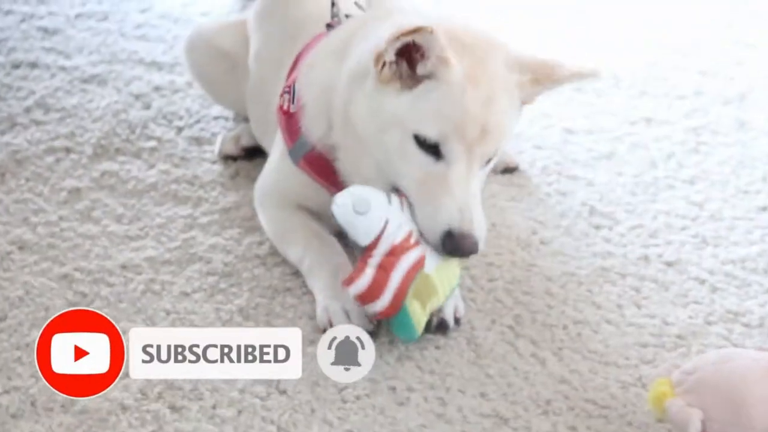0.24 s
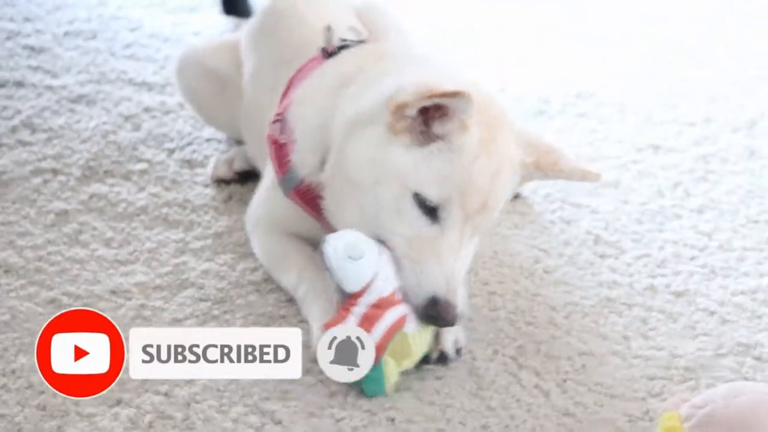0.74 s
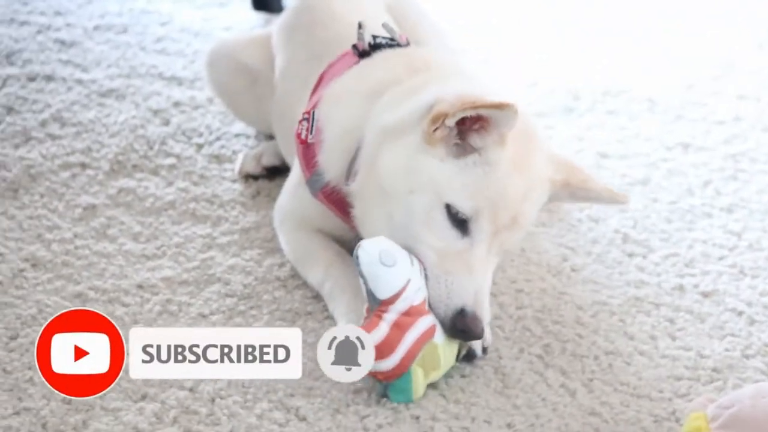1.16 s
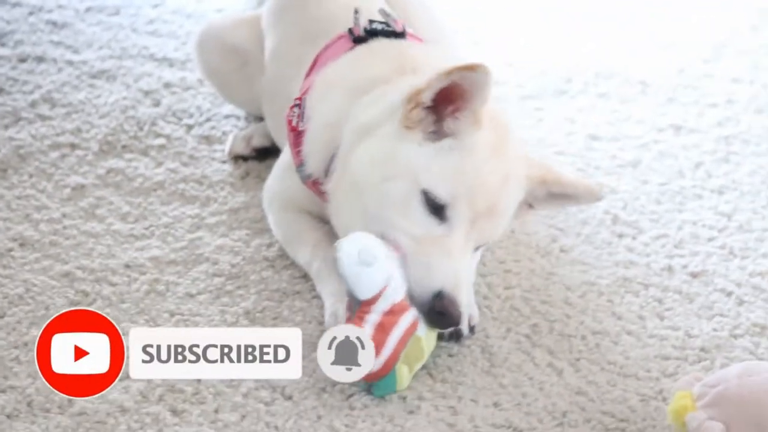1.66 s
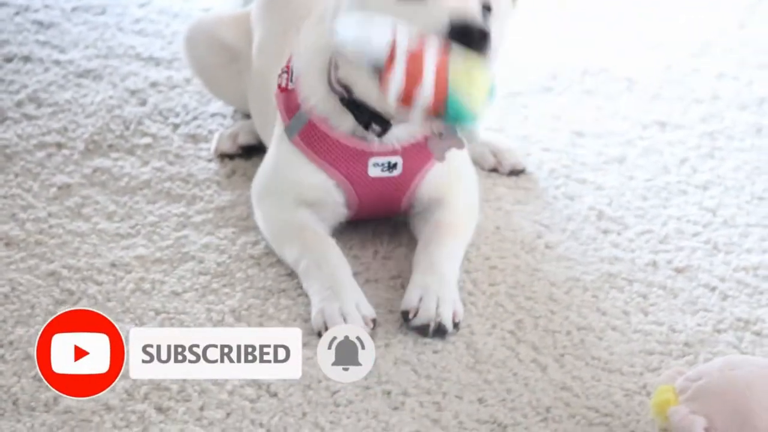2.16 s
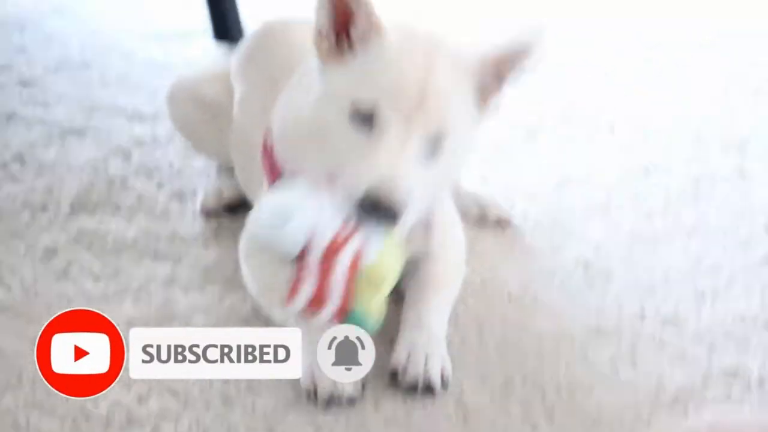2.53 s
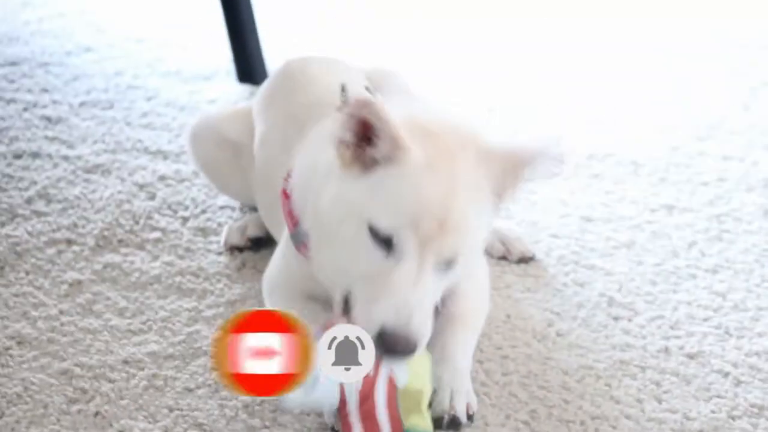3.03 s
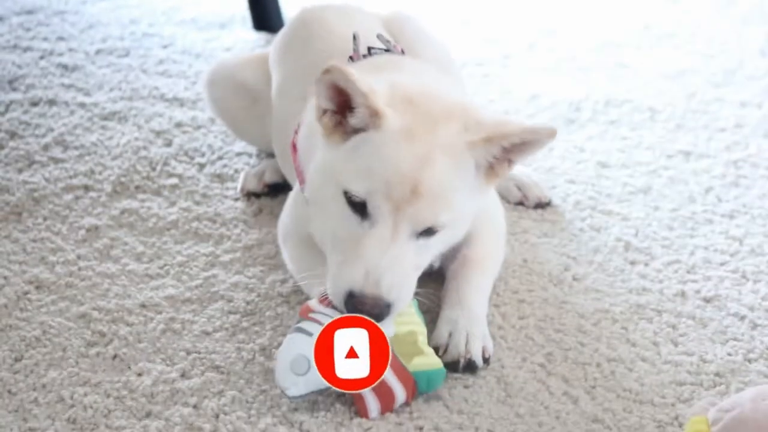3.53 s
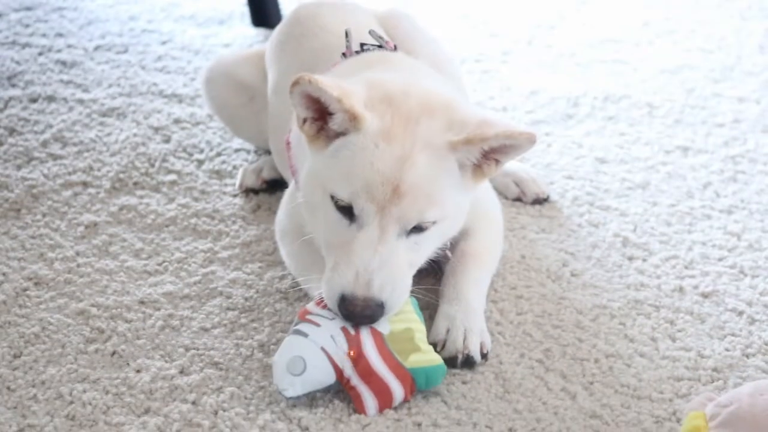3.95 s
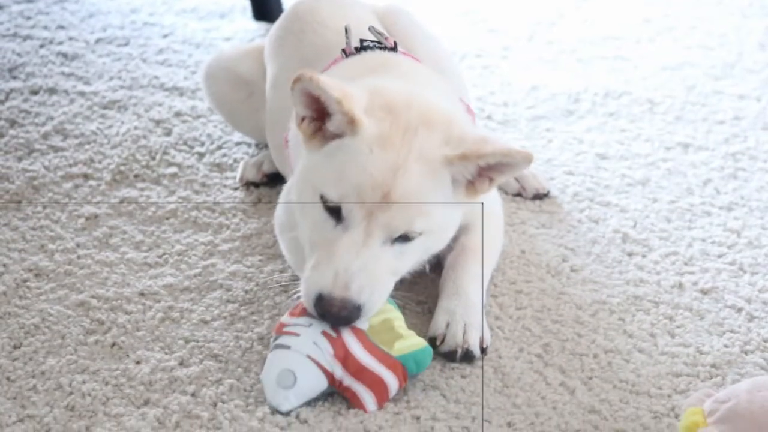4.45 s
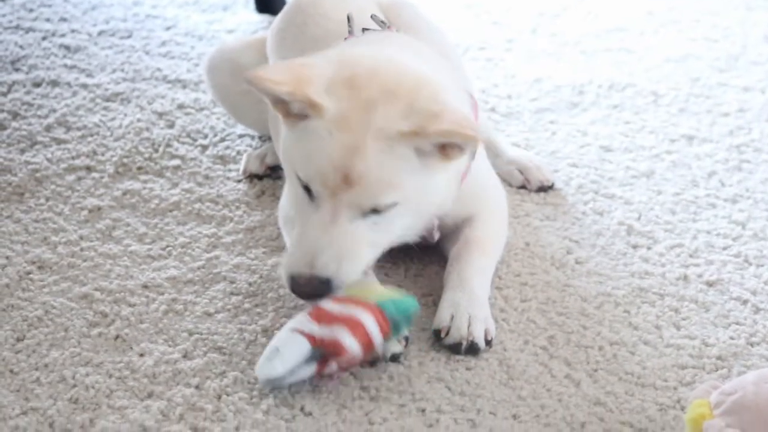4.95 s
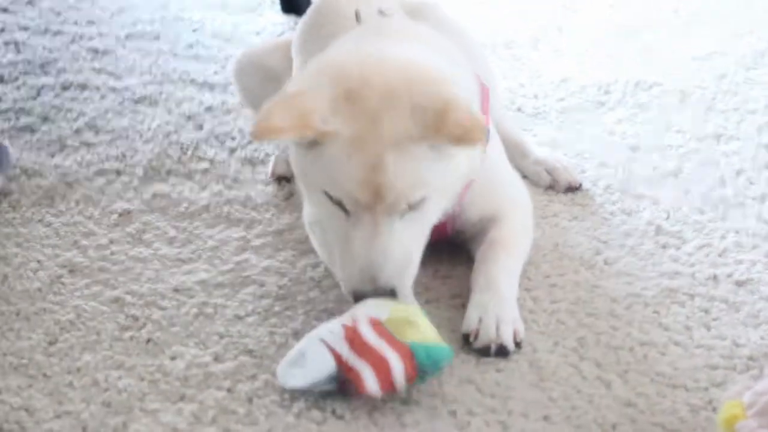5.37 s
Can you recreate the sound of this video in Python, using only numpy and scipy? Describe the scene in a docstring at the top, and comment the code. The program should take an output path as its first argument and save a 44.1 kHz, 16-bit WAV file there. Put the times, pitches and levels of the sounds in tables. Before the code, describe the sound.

A small reed squeaker inside a soft toy chirps unevenly under a puppy's bites, bright on free presses and duller when jaws cover it. Plastic pops kick the pitch upward, and light tooth or claw touches tick between. Short echoes and a modest room tail follow each squeak. A near microphone also catches faint hiss and low hum, with a lone paw thump on carpet near the end.

```python
"""A puppy chews a plush toy on a carpet, close to a camera in a quiet living room with a low hum.
From the start, each bite drives air through the squeaker's reed: a clean buzz that follows pressure.
Soon the plastic bulb starts to pop as its wall snaps, and a paw thumps softly on the carpet.
Teeth, claws and the toy touching down tick in between, as noise bursts; echoes and room ring on.
After the last squeak, only a thump and a few ticks break the hum."""
import sys
import numpy as np
from scipy import signal
from scipy.fft import rfft, irfft, next_fast_len
from scipy.io import wavfile
from scipy.ndimage import uniform_filter1d

SR = 44100
rng = np.random.default_rng(int(sys.argv[2]) if len(sys.argv) > 2 else 0)


def unload_audio(sound):
    """Save the sound as a 16-bit wav file, at the path given as the first command line argument."""
    columns = np.transpose(np.atleast_2d(sound))
    # keep every value between -1 and 1, then stretch to whole-number steps
    steps = np.round(np.clip(columns, -1, 1) * 32767)
    wavfile.write(sys.argv[1], SR, steps.astype(np.int16))


N = 246777  # length in samples
LEAD_S = .06  # the mix starts this early, for sounds already under way


def gain_of(db):
    """Turns decibels into a gain: 20 dB is ten times the swing."""
    return 10 ** (np.asarray(db) / 20)


def evened(x):
    """Scales a signal to an average strength (rms) of 1."""
    return x / np.sqrt(np.mean(x ** 2) + 1e-20)


def read(points, hz):
    """Reads a curve between its points, with pitch spaced by ratio as we hear it."""
    point_hz, value = np.transpose(points)
    return np.interp(np.log(hz + 1), np.log(point_hz + 1), value)


def add(mix, s, sound):
    """Adds a sound to the mix at time s, cutting off what runs past the end."""
    part = mix[..., round((s + LEAD_S) * SR):][..., :sound.shape[-1]]
    part += sound[..., :part.shape[-1]]


# how alike left and right are: (f/Hz, likeness 0-1)
LIKENESS = [(60, 0.98), (130, 0.93), (290, 0.83), (640, 0.64), (1410, 0.21), (3100, 0.022), (6820, 0.029),
            (15000, 0.049)]


def left_and_right(left, other, hz):
    """Mixes some left noise into the right, so the two sides are alike mostly in the bass."""
    same = np.clip(read(LIKENESS, hz), -1, 1)[:, None]
    right = same * left + np.sqrt(1 - same ** 2) * other
    return np.array([left, right])


# colour of house hum and microphone hiss, before its overall level is set: (f/Hz, relative level/dB)
HUM_COLOUR = [(12, -73), (20, -36), (43, -21.5), (81, 0), (129, -7.5), (151, -12), (183, -12.5),
              (410, -12.5), (582, -22), (1080, -24.5), (2860, -31.5), (3270, -30), (3550, -30.5),
              (12600, -39.5)]
# added to that colour, so the hiss thins out at the top: (f/Hz, level change/dB)
HISS_TOP_FALL = [(12400, -8), (12900, -14), (16000, -20)]
HUM_DB, HUM_PATCHY_DB = -66.5, 1.0


def hum():
    """House hum and hiss: random short-time spectra whose strength drifts in patches."""
    frames, hz = N // 512 + 5, np.fft.rfftfreq(2048, 1 / SR)
    a, b, c, d, patches = rng.standard_normal((frames, 1025, 5)).T
    patches = uniform_filter1d(patches, 12, 0)  # smooth over pitch
    patches = evened(uniform_filter1d(patches, 8, 1))  # and over time
    spectra = left_and_right(a + 1j * b, c + 1j * d, hz)
    colour_db = read(HUM_COLOUR, np.minimum(hz, 12400)) + read(HISS_TOP_FALL, hz)
    spectra *= gain_of(colour_db[:, None] + HUM_PATCHY_DB * patches)
    noise = signal.istft(spectra, nperseg=2048, noverlap=1536)[1][:, :N]
    return gain_of(HUM_DB) * evened(noise)


JOLT_RISE_S, JOLT_PITCH_S, JOLT_LEVEL_S = 0.0034, 0.0062, 0.028
JOLT_DB_PER_HZ = 0.0823  # level change for each Hz of jolt


def jolt(t, fall_s):
    """A snapping bulb wall jolts the pressure: a quick swell, then a decay, in Hz of pitch."""
    s, size_hz = np.array(BULB_POPS)[:, [0, 3]].T
    late = t[:, None] - s - JOLT_RISE_S / 2
    rise = np.minimum(late, 0) / JOLT_RISE_S
    fall = np.maximum(late, 0) / fall_s
    return (size_hz * np.exp(rise - fall)).sum(1)


# bulb colour, free: (f/Hz, level against the fundamental/dB)
FREE_BULB = [(800, 1), (1650, 6.5), (2500, 6.5), (3300, 5), (4200, 2.5), (5000, 1.5)]
# bulb colour, covered by jaws and plush: (f/Hz, level against the fundamental/dB)
COVERED_BULB = [(800, 1.5), (1650, -7.5), (2500, -13.5), (3300, -14), (4200, -15.5), (5000, -19.5)]
# neck colour with air driven out: (f/Hz, level against the neck resonance/dB)
NECK_BLOWN = [(6000, 0), (7500, 1.5), (9000, -14.5), (11000, -6.5), (13000, -14)]
# neck colour with air drawn in: (f/Hz, level against the neck resonance/dB)
NECK_SUCKED = [(6000, -19), (7500, -1), (9000, -2.5), (11000, -7), (13000, -2)]
# added above the neck resonance, mostly a fall: (f/Hz, level change/dB)
NECK_TOP = [(8900, 6.5), (9700, -1), (11000, -3), (13000, -16.5), (15000, -24)]
DIP_OCTAVES = 0.23
FLUTTER_DB, FLUTTER_S = 2.5, .015  # each harmonic's level wavers slowly at random


def colour(order, partial_hz, treble_db, covered, inward, dip_hz, dip_db):
    """The bulb colours the lowest six harmonics, the neck the rest; a dip or bump reshapes both."""
    body_db = (1 - covered) * read(FREE_BULB, partial_hz) + covered * read(COVERED_BULB, partial_hz)
    body = gain_of(body_db) * (order <= 6)
    neck_db = (1 - inward) * read(NECK_BLOWN, partial_hz) + inward * read(NECK_SUCKED, partial_hz)
    neck = gain_of(neck_db + read(NECK_TOP, partial_hz)) * (order > 6)
    body_share = body / np.linalg.norm(body, axis=0)
    neck_share = gain_of(treble_db) * neck / np.linalg.norm(neck, axis=0)
    noise = rng.standard_normal(partial_hz.shape)
    flutter = evened(uniform_filter1d(noise, round(FLUTTER_S * SR), axis=1))
    dip = np.exp(-(np.log2(partial_hz / dip_hz) / DIP_OCTAVES) ** 2)
    return (body_share + neck_share) * gain_of(dip_db * dip + FLUTTER_DB * flutter)


# one row a squeak; pitch and level are before jolts, level also before left-right balance:
# (start t/s, hold t/s, release t/s, start f/Hz, end of hold f/Hz, arch of pitch f/Hz, top of arch 0-1,
#  start level/dB, end of hold level/dB, start treble against level/dB, end treble against level/dB,
#  bulb free to covered 0-1, air out to drawn inward 0-1, dip or bump f/Hz, its level change/dB)
BITES = [ (-.045, 0.011, 0.039, 812, 790, 1, .4, -39, -43.5, 6.5, 5, 0.36, 0.06, 1610, -6),
         (0.039, 0.0011, 0.0091, 775, 767, 0, .4, -38, -45.5, 1, 1, 0.05, 0.2, 2360, -11),
         (0.123, .086, 0.022, 760.4, 751.6, 35, 0.28, -49, -50.5, -7.5, -7, 0.69, 0.66, 4200, -7.5),
         (.238, .023, 0.0053, 690.3, 755, 1, 0.3, -59.5, -49.5, -8, -5.5, 0.63, 0.86, 4170, -6),
         (0.347, 0.021, 0.028, 814.7, 837.6, -4.5, 0.55, -42.5, -43.5, 3.5, 2.5, 0.26, 0.47, 4040, -3.5),
         (.395, .035, 0.012, 720, 751.7, 15, 0.49, -52.5, -49.5, -1, 4, 0.34, 0, 4230, 0),
         (.598, 0.18, .018, 846, 722, -45.5, 0.31, -42, -55.5, -9, -10.5, 0.52, 0.69, 4630, -8.5),
         (1.066, .015, 0.028, 805, 840, -4.5, 0.3, -40, -42, -5.5, -0.5, 0.19, 0.05, 4460, -1),
         (1.152, 0.0025, 0.014, 789, 782, 4, .4, -43, -44, -4, -4, .3, 0, 4800, -4.5),
         (1.442, 0.0038, 0.0057, 836, 783, 11, .4, -66, -59, -14, -14, 1, 0.2, 4760, 3),
         (1.695, 0.0022, 0.026, 820, 804, 6, 0.3, -39.5, -42, -4.5, 1, 0.33, 0.35, 5000, -6.5),
         (2.228, .027, 0.0021, 804, 698, -3, 0.2, -38, -54.5, 4, -6.5, -.2, 0.16, 830, 0.5),
         (2.856, 0.055, 0.01, 825, 788, 30, 0.41, -47, -48.5, -3.5, -4, 0.6, 1, 2340, -6.5),
         (3.181, 0.019, .003, 811.4, 709, 3.5, 0.5, -42, -53.5, 1.5, 0.5, .7, 0.14, 4170, 1),
         (3.252, 0.033, 0.0098, 796, 820, -3, 0.1, -48.5, -48.5, -8, -3.5, 0.59, .9, 3640, -4.5),
         (3.466, 0.02, 0.018, 788, 774.6, -0.5, 0.3, -44.5, -49.5, 0.5, 3, 0.55, 0.11, 4160, -0.5),
         (3.625, 0.0019, 0.037, 844, 802, 2, .4, -44, -46.5, -9.5, -3, 0.88, 0.6, 3380, -2),
         (3.707, 0.012, 0.033, 781.6, 782.5, -6, .4, -48, -47.5, 1.5, 8, 0.49, 0.06, 2200, -4.5),
         (3.953, 0.067, 0.0033, 790, 798.2, 27.5, 0.46, -48, -47.5, -7, -5.5, 0.82, 0.72, 3350, -3),
         (4.221, 0.018, 0.023, 784, 783, -1.5, 0.5, -46, -46.5, -2.5, 5, 0.58, .05, 2380, -6),
         (4.431, 0.075, 0.013, 835, 809.6, 104.5, 0.43, -46, -45.5, -6.5, -5, 0.76, 0.55, 6300, -4), ]
SAG_HZ_PER_S, FADE_DB_PER_S = 4600, 590  # during the release
LEAK_SAG_PER_S = 10  # share of the pitch lost a second, after the release
DB_PER_HZ = 0.0361  # more pressure lifts pitch and level together
SWING_IN_S, RING_DOWN_S = 0.00083, .004
SCATTER_RAD = 0.52  # a random phase offset for each harmonic, so their peaks do not all line up
AIR_DB = -18  # air hiss against level, before treble is added


def squeak(start, hold, release, hz0, hz1, arch_hz, top, db0, db1, treble0_db, treble1_db,
           covered, inward, dip_hz, dip_db):
    """The reed chops the air once a cycle; bulb and neck colour the harmonics."""
    t = np.arange(start - .008, start + hold + release + .025, 1 / SR)
    held = np.clip((t - start) / hold, 0, 1)
    let_go = np.clip(t - start - hold, 0, release)
    after = np.maximum(t - start - hold - release, 0)
    # bending time puts the top of the arch where the row says
    bend = np.log(.5) / np.log(np.clip(top, .1, .9))
    arch = arch_hz * np.sin(np.pi * held ** bend)
    progress = np.clip((t - start) / (hold + release), 0, 1)
    treble_db = treble0_db + (treble1_db - treble0_db) * progress

    hz = hz0 + (hz1 - hz0) * held + arch - SAG_HZ_PER_S * let_go + jolt(t, JOLT_PITCH_S)
    hz = hz * (1 - LEAK_SAG_PER_S * after)  # the pitch sags as the last pressure leaks away
    level_db = db0 + (db1 - db0) * held + DB_PER_HZ * arch - FADE_DB_PER_S * let_go
    level_db = level_db + JOLT_DB_PER_HZ * jolt(t, JOLT_LEVEL_S)
    wobble = evened(uniform_filter1d(rng.standard_normal(len(t)), 60))
    turns = np.cumsum(hz * (1 + .003 * wobble)) / SR  # reed cycles so far

    order = np.arange(1, 19)[:, None]
    partial_hz = order * hz
    share = colour(order, partial_hz, treble_db, covered, inward, dip_hz, dip_db)
    # each puff radiates a push and a pull, and the neck rings on after it
    phase = .9 - 2.5 * np.arctan((partial_hz - 7300) / 1500)
    phase = phase + SCATTER_RAD * rng.standard_normal(order.shape)
    buzz = np.sqrt(2) * (share * np.cos(2 * np.pi * order * turns + phase)).sum(0)
    # air hisses through the slot while the reed is open
    slot = signal.butter(2, [4000, 9300], "bandpass", fs=SR, output="sos")
    reed_open = 1 + np.cos(2 * np.pi * turns)
    air = evened(signal.sosfilt(slot, rng.standard_normal(len(t)) * reed_open))
    # the swing grows before the start and dies after the release
    swing = np.exp(np.minimum(t - start, 0) / SWING_IN_S) * np.exp(-after / RING_DOWN_S)
    return t[0], gain_of(level_db) * swing * (buzz + gain_of(AIR_DB + treble_db) * air)


# how the two microphone ports differ in strength: (f/Hz, left over right level/dB)
LEFT_OVER_RIGHT = [(800, 3.5), (1600, 0.5), (2500, -1.5), (3800, 3), (5500, 2.5), (7500, 1.5), (9000, 0.5)]
# how the two ports differ in timing: (f/Hz, left lag/rad)
LEFT_LAG = [(300, 0.058), (800, 0.41), (2500, 0.99), (3800, 0.11), (5500, 1.3), (7800, 1.22), (11000, 1.36)]


def ports(x):
    """The direct sound reaches the two microphone ports with its own balance and lag."""
    hz = np.fft.rfftfreq(x.shape[1], 1 / SR)
    half = gain_of(read(LEFT_OVER_RIGHT, hz) / 2) * np.exp(-.5j * read(LEFT_LAG, hz))
    return irfft(rfft(x) * np.array([half, 1 / half]), x.shape[1])


# bounces off the floor and near furniture: (delay t/s, level against the direct sound/dB)
NEAR_BOUNCES = [(.0021, -16), (.0047, -17), (.009, -14.5), (.014, -10.5)]


def add_echoes(mix, mono):
    """Near surfaces return single delayed copies, by turns on the left and right."""
    for k, (delay_s, db) in enumerate(NEAR_BOUNCES):
        add(mix[k % 2], delay_s - LEAD_S, gain_of(db) * mono)  # undo the lead: mono already has it


# how long the room rings: (f/Hz, time to fall by 60 dB t/s)
RING_TIMES = [(250, 0.36), (800, 0.43), (1740, 0.41), (4590, 0.43), (8000, 0.43), (13000, 0.23)]
# colour of the ringing, before its overall level is set: (f/Hz, relative level/dB)
RING_COLOUR = [(200, -6.5), (450, -1.5), (800, -0.5), (2000, -6), (5000, -1.5), (7000, -8.5), (8800, 0.5),
               (10000, 0), (13000, 6)]
ROOM_DB, ROOM_START_S, ROOM_BUILD_S = -2.0, 0.001, 0.011


def room(x):
    """A dense noise tail stands for the reflections, each band dying at its own speed."""
    noise = rng.standard_normal((2, SR))
    hz, t, (left, other) = signal.stft(noise, SR, nperseg=256)
    spectra = left_and_right(left, other, hz)
    spectra *= gain_of(-60 * t / read(RING_TIMES, hz)[:, None] + read(RING_COLOUR, hz)[:, None])
    tail = signal.istft(spectra, SR, nperseg=256)[1]
    tail *= np.clip((np.arange(tail.shape[1]) / SR - ROOM_START_S) / ROOM_BUILD_S, 0, 1)
    tail /= np.linalg.norm(tail[0])
    return gain_of(ROOM_DB) * signal.fftconvolve(x[None], tail, axes=1)[:, :len(x)]


SNAP_EARLY = 128  # samples of room before a burst, for the smear of its filter


def snap(s, db, centre_hz, octaves, length):
    """A short burst of noise with a quick rise, in a broad band."""
    t = np.arange(1024) / SR
    burst = rng.standard_normal(len(t)) * (1 - np.exp(-t / 0.00013)) * np.exp(-3 * t / length)
    hz = np.fft.rfftfreq(len(t), 1 / SR) + 1
    band = np.exp(-(np.log2(hz / centre_hz) / octaves) ** 2 / 2)
    burst = irfft(rfft(np.roll(burst, SNAP_EARLY)) * band)
    strength = np.sqrt((burst ** 2).sum() / (length * SR / 4))
    return s - SNAP_EARLY / SR, gain_of(db) * burst / strength


# the bulb's wall snaps in or out; level is before the ports:
# (t/s, level/dB, centre f/Hz, jolt of the reed's pitch f/Hz)
BULB_POPS = [(0.032, -45, 2480, -6), (0.202, -54, 900, 48.5), (.259, -50, 880, 47),
             (.363, -39.5, 720, 60.5), (.428, -47, 870, 11.5), (.766, -73, 900, 64.5),
             (1.079, -38, 716, 100.5), (2.914, -62, 900, 27), (3.282, -59, 905, 34),
             (3.483, -39.5, 785, 111.5), (3.718, -42, 800, 102.5), (4.005, -72, 890, 54),
             (4.239, -36.5, 700, 100.5), (4.509, -52.5, 626, 110)]


def pop(s, db, centre_hz, _jolt_hz):
    """The bulb's wall snaps: a brief noise burst around one pitch."""
    return snap(s, db, centre_hz, octaves=1.0, length=0.0095)


# a paw on the carpet; level is the peak setting before the ports: (t/s, level/dB, f/Hz, length t/s)
PAW_THUMPS = [(0.206, -48.5, 183.4, 0.025), (5.275, -47.5, 238, 0.0083)]


def thump(s, db, hz, length):
    """A paw on carpet: a few soft low cycles that swell and fade."""
    t = np.arange(0, length, 1 / SR)
    return s, gain_of(db) * np.sin(2 * np.pi * hz * t) * np.sin(np.pi * t / length)


# teeth, claws and the toy touching down; level is before the ports:
# (t/s, level/dB, centre f/Hz, spread/octaves, length t/s)
TOUCHES = [(0.818, -51.5, 443, 0.59, 0.0076), (1.441, -50.5, 580, 1, 0.0088),
           (2.178, -50.5, 1320, 0.94, 0.019), (2.193, -45, 2450, 0.74, 0.0039),
           (5.273, -58, 1800, 1.04, 0.0052), (5.277, -54, 1000, 1.1, 0.0071),
           (5.281, -55, 450, 0.25, 0.0084), (5.324, -66.5, 2350, 0.6, 0.012)]


def tick(s, db, centre_hz, octaves, length):
    """A small hard touch: a noise burst with its own pitch, spread and length."""
    return snap(s, db, centre_hz, octaves, length)


PAN_DB = -2.5  # squeaks, left over right


def scene():
    """Toy and puppy, their near echoes and the room, over the hum."""
    lead = round(LEAD_S * SR)
    near = np.zeros((2, next_fast_len(N + lead)))
    pan = gain_of([[PAN_DB / 2], [-PAN_DB / 2]])
    for row in BITES:
        s, sound = squeak(*row)
        add(near, s, sound * pan)
    for row in BULB_POPS:
        add(near, *pop(*row))
    for row in PAW_THUMPS:
        add(near, *thump(*row))
    for row in TOUCHES:
        add(near, *tick(*row))
    mix, mono = ports(near), near.mean(0)
    add_echoes(mix, mono)
    mix += room(mono)
    return mix[:, lead:lead + N] + hum()


EDGE_HZ = 15650


def record(dry):
    """The recorder's band limit: a steep filter removes the sound above its edge."""
    low_pass = signal.firwin(511, EDGE_HZ, window=("kaiser", 9), fs=SR)
    return signal.oaconvolve(dry, low_pass[None], "same")


dry = scene()
out = record(dry)
unload_audio(out)
```